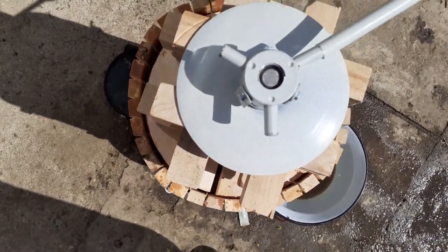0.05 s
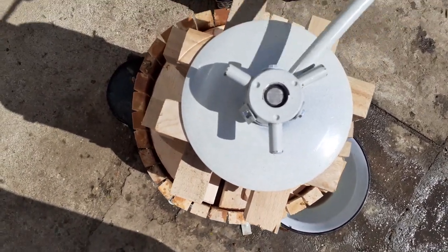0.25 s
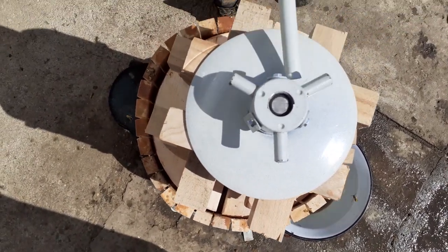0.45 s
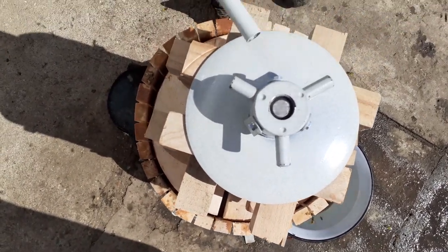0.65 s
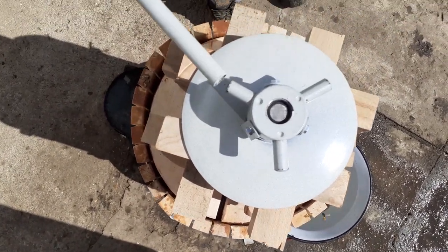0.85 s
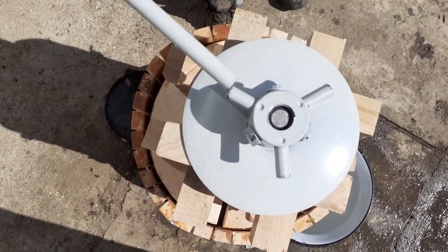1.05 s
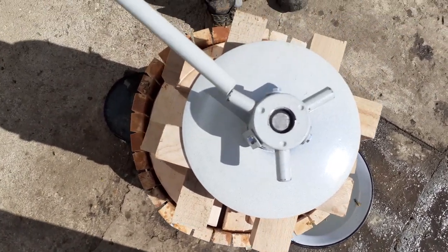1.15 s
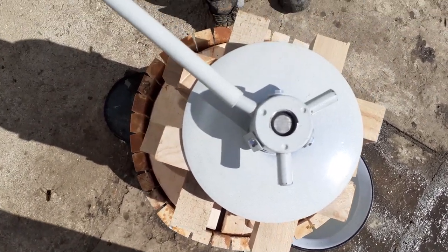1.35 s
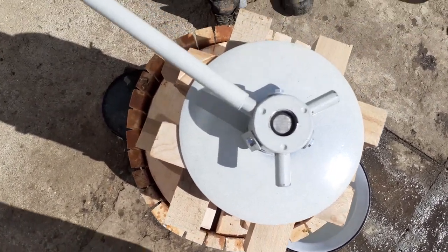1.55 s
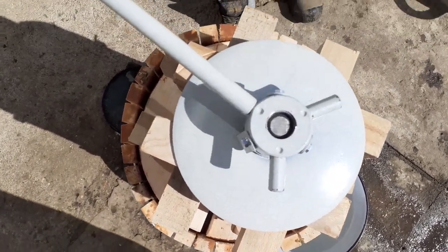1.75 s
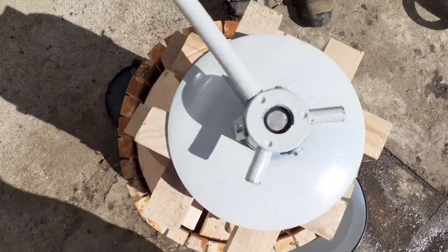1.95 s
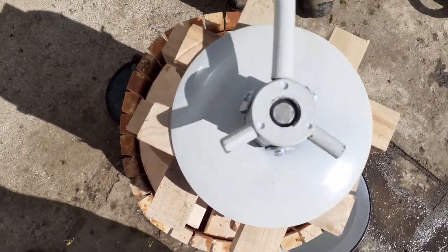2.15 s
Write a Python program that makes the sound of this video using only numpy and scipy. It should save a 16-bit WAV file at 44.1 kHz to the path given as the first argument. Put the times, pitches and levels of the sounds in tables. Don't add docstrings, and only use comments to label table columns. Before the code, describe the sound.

Metal pipe cracks against a screw press stub, rings briefly and is damped by hand; a small clank follows, then wood blocks tick and creak under load, with soft rustle and faint hiss, close-miked in a quiet yard.

```python
import sys
import numpy as np
from scipy import signal
from scipy.fft import rfft, irfft, next_fast_len
from scipy.io import wavfile
from scipy.ndimage import map_coordinates

SR = 44100
rng = np.random.default_rng(int(sys.argv[2]) if len(sys.argv) > 2 else 0)


def gain_from_db(level_db):
    decades = np.asarray(level_db, float) / 20
    return 10 ** decades


def inscribe(sig):
    pcm = np.round(np.clip(np.atleast_2d(sig).T, -1, 1) * 32767)
    wavfile.write(sys.argv[1], SR, pcm.astype(np.int16))


N = 97020

# frequency in Hz, level in dB, decay time T60 in seconds.
HUB = [(609.4, -9, 0.046), (704, -2.5, 0.029), (1040, -8.5, 0.034), (1176.5, -2, 0.043), (1231, 0, 0.043),
       (1561.6, -4, 0.066), (1877, -5.5, 0.067), (2050, -24.5, 0.062), (2337, -4, 0.033),
       (2550, -8.5, 0.026)]


def unit(x):
    return x / np.sqrt(np.mean(x ** 2) + 1e-20)


def along(points, hz):
    f, v = np.transpose(points)
    return np.interp(np.log(hz + 1), np.log(f + 1), v)


def curve(rows):
    s, v = np.transpose(rows)
    return np.interp(np.arange(N) / SR, s, v)


def wobble(rate):
    knots = rng.standard_normal(int(N * rate / SR) + 4)
    return map_coordinates(knots, [np.arange(N) * rate / SR])


def filtered(x, response):
    m = next_fast_len(x.shape[-1] + 8192)
    return irfft(rfft(x, m) * response(np.fft.rfftfreq(m, 1 / SR)), m)[..., :x.shape[-1]]


def causal(x, points):
    cepstrum = irfft(np.log(gain_from_db(along(points, np.fft.rfftfreq(2048, 1 / SR)))))
    cepstrum[1:1024] *= 2
    cepstrum[1025:] = 0
    impulse = irfft(np.exp(rfft(cepstrum)))[:1024]
    return signal.fftconvolve(x, impulse)[:len(x)]


def noise(points, size=N):
    return unit(filtered(rng.standard_normal(size), lambda hz: gain_from_db(along(points, hz))))


def add(track, s, sound):
    part = track[round(s * SR):][:len(sound)]
    part += sound[:len(part)]


def ring(modes, tilt_db, t, scatter_db):
    hz, db, t60 = np.transpose(modes)[:, :, None]
    draw = rng.standard_normal((2, len(modes), 1))
    level = gain_from_db(db + tilt_db * np.log2(hz / 2000) + scatter_db * draw[0] - 60 * t / t60)
    onset = 1 - np.exp(-t / .0004)
    return np.sum(level * np.sin(2 * np.pi * hz * t + .35 * draw[1]), 0) * onset


def tick(hz, cycles, t):
    turn = 2 * np.pi * hz * t * (1 + 0.63 * t * rng.standard_normal())
    main = np.sin(turn) * gain_from_db(-60 * t * hz / cycles)
    overtone = 0.058 * np.sin(2.494 * turn) * gain_from_db(-90 * t * hz / cycles)
    return (main + overtone) * np.clip(t / 0.00037, 0, 1)


def air():
    # frequency in Hz, level in dB.
    rumble = [(20, -32.5), (60, 0.5), (120, -11), (250, -20.5), (600, -68)]
    # frequency in Hz, level in dB.
    hiss = [(4000, -3.5), (6000, -13), (9000, -21), (10500, -3.5), (13000, 4.5), (15700, 1.5), (16000, -47)]
    # time in seconds, level in dB.
    hiss_swell = [(0, 1), (.6, -1), (1.3, -1.5), (1.6, 1.5), (1.87, 2), (1.895, 9), (1.92, 1), (2.2, 1)]
    # centre in seconds, half width in seconds, level in dB.
    gusts = [(0.054, 0.021, -52), (.33, 0.064, -55.5), (1.7, 0.014, -65), (1.81, 0.027, -65.5),
             (2.06, 0.074, -62)]
    breeze_db, hiss_db, hiss_left_db = -75.5, -72, 1.5
    thump_s, thump_db, thump_hz, thump_fall_s = .295, -46, 218, 0.017

    t = np.arange(N) / SR
    blow = gain_from_db(breeze_db) + sum(gain_from_db(db - 2.2 * ((t - s) / half) ** 2) for s, half, db in gusts)
    wind = blow * np.array([noise(rumble) * gain_from_db(2.0 * wobble(2.3)) for _ in range(2)])

    u, jolt = t[:SR // 6], np.zeros(N)
    turn = 2 * np.pi * (50 * u + thump_hz * thump_fall_s * (1 - np.exp(-u / thump_fall_s)))
    add(jolt, thump_s, gain_from_db(thump_db) * np.sin(turn) * (u / 0.013) * np.exp(1 - u / 0.014))

    hiss_level = gain_from_db([[hiss_db + hiss_left_db], [hiss_db]]) * gain_from_db(curve(hiss_swell))
    return wind + jolt * gain_from_db([[4], [-4]]) + hiss_level * np.array([noise(hiss), noise(hiss)])


def puffs():
    # centre in seconds, half width in seconds, level in dB, centre frequency in Hz.
    brushes = [(.055, 0.011, -66.5, 5600), (.853, 0.0068, -67.5, 3550), (1.022, .012, -73, 5800),
               (1.097, 0.0074, -65, 3660), (1.225, .008, -69.5, 4000)]
    t, out = np.arange(N) / SR, np.zeros(N)
    for s, half, db, hz in brushes:
        band = noise([(hz / 2.5, -30), (hz, 0), (hz * 1.34, -30), (hz * 2, -80)])
        out += gain_from_db(db - 4.6 * ((t - s) / half) ** 2) * band
    return out


def rustle():
    # frequency in Hz, level in dB per Hz.
    colour = [(60, -15.5), (180, -8), (290, -1.5), (400, -5), (560, -2.5), (1000, -8.5), (2600, -12),
              (3300, -17), (6000, -31), (9000, -55.5)]
    # frequency in Hz, level in dB.
    shadow = [(60, -11), (300, -9), (700, -12.5), (1500, -22.5), (3000, -28), (6000, -14.5), (12000, -12)]
    # time in seconds, level in dB.
    work = [(0, -54), (.55, -58), (.7, -60), (.8, -60), (1.3, -59), (1.55, -57), (1.68, -54), (1.85, -52.5),
            (2.0, -54.5), (2.2, -54.5)]
    # frequency in Hz, level in dB.
    grain_modes = [(330, -4.5), (580, -5.5), (760, -4.5), (1400, -2.5), (2620, -5)]
    grains_per_s, grain_db, alike = 260, -6, 0.49

    grains, t = np.zeros(N), np.arange(SR // 25) / SR
    for u, a, b in rng.random((int(grains_per_s * N / SR), 3)):
        hz, db = grain_modes[int(b * len(grain_modes))]
        grain = tick(hz * (1 + .07 * rng.standard_normal()), 14 + hz / 45, t)
        add(grains, u * N / SR, gain_from_db(db - 5.4 * np.log(1 - a + .02)) * grain)
    near = noise(colour) * gain_from_db(1.96 * wobble(24.766)) + gain_from_db(grain_db) * unit(grains)
    far = alike * near + np.sqrt(1 - alike ** 2) * noise(colour)
    far = filtered(far, lambda hz: gain_from_db(along(shadow, hz)))
    return gain_from_db(curve(work) + 3.5) * np.array([near, far])


def wood():
    # start in seconds, peak in dB, frequency in Hz.
    ticks = [(0.014, -38, 744), (0.591, -44.5, 1010), (0.734, -45, 683), (0.769, -34.5, 689),
             (1.312, -51.5, 511), (1.409, -44.5, 646), (1.419, -38, 710), (1.434, -41.5, 600),
             (1.460, -42, 664), (1.48, -48.5, 623), (1.5, -45, 492), (1.538, -43.5, 570), (1.556, -46, 540),
             (1.581, -40.5, 760), (1.608, -40, 565), (1.639, -43, 530), (1.671, -37.5, 459),
             (1.697, -34.5, 520), (1.737, -33, 677), (1.742, -35, 710), (1.75, -38.5, 546),
             (1.772, -37.5, 640), (1.82, -46, 526), (1.869, -40.5, 705), (1.891, -34, 740),
             (1.92, -32, 507), (2.004, -33.5, 518), (2.039, -41, 575), (2.052, -43, 630), (2.119, -41, 485)]
    # start in seconds, peak in dB, frequency in Hz.
    pings = [(0.777, -42, 2586), (1.353, -42.5, 1890), (1.318, -43, 2150), (1.509, -47.5, 1560),
             (1.581, -53, 2770), (1.611, -47, 1520), (1.736, -43, 1240), (1.776, -53, 1700),
             (1.872, -43.5, 1103), (1.898, -39, 1575), (2.1, -59, 2610), (2.124, -42.5, 2475),
             (2.14, -45.5, 1295), (2.181, -47.5, 1415)]
    # start in seconds, length in seconds, level in dB, first and last pitch in Hz.
    creaks = [
        (.785, .06, -56, 330, 290),
        (1.67, .025, -48, 470, 520),
        (1.82, .06, -53, 500, 800),
        (1.933, .03, -47, 470, 600),
        (1.945, .035, -58, 2750, 2300),
        (2.015, .03, -49, 480, 620),
    ]

    out, t = np.zeros(N), np.arange(SR // 8) / SR
    for s, db, hz in ticks:
        woken = gain_from_db(-27) * ring(HUB, -4.5, t, scatter_db=8.5)
        add(out, s, gain_from_db(db) * (tick(hz, 18.2, t) + woken))
    for s, db, hz in pings:
        add(out, s, gain_from_db(db) * tick(hz, 60, t))
    for s, length, db, from_hz, to_hz in creaks:
        u = np.clip(t / length, 0, 1)
        pitch = (from_hz + (to_hz - from_hz) * u) * (1 + 0.038 * wobble(110)[:len(t)])
        level = gain_from_db(db + 4.2 * wobble(118)[:len(t)]) * np.sqrt(np.abs(np.sin(np.pi * u)))
        add(out, s, level * np.sin(2 * np.pi * np.cumsum(pitch) / SR))
    return out


def hub_blows():
    # start in seconds, peak in dB, brightness in dB an octave, favoured frequency in Hz.
    thuds = [(0.2153, -20.5, 7, 1300), (0.2608, -27, 5, 1240), (.284, -31, -3.5, 700),
             (0.292, -33, -2, 1205), (0.299, -34, -2.5, 1550), (0.324, -41.5, -2.5, 1330),
             (0.3548, -36.5, 6, 1290), (0.422, -37.5, 0.5, 1335), (0.4423, -29.5, 0, 1100),
             (.450, -22, 5, 1790), (.461, -29.5, -2, 1497), (0.4702, -26.5, 0.5, 1150),
             (0.481, -27, -2, 1430), (0.493, -36.5, -3.5, 1200), (0.502, -42, -4, 1530),
             (0.9362, -35, 1, 594), (0.939, -27, -0.5, 1230), (1.138, -51.5, -8, 1020),
             (1.318, -43.5, -1.5, 1200), (1.349, -50.5, -5, 960), (1.383, -47, -6.5, 1180),
             (1.697, -40, -6, 1250)]
    favour_db, favour_octaves = 4, 0.24
    dense_db, dense_t60 = -1, 0.059

    out, t = np.zeros(N), np.arange(SR // 5) / SR
    for s, db, tilt_db, favour_hz in thuds:
        modes = []
        for hz, level, t60 in HUB:
            nearness = np.exp(-(np.log2(hz / favour_hz) / favour_octaves) ** 2)
            modes.append((hz, level + favour_db * nearness, t60))
        colour = [(300, -20.5), (1500, 6), (2400, tilt_db - 5.5), (5000, 2 * tilt_db - 27), (7000, -58.0)]
        dense = noise(colour, size=len(t))
        dense *= gain_from_db(dense_db - 60 * t / dense_t60) * np.clip(t / 0.0012, 0, 1)
        add(out, s, gain_from_db(db) * (ring(modes, tilt_db, t, scatter_db=1.56) + dense))
    return out


def scrapes():
    # start in seconds, length in seconds, level in dB, brightness in dB an octave.
    strokes = [(0, 0.014, -41, -7), (0.272, 0.068, -34.5, -1), (0.442, 0.049, -25.5, 3),
               (0.771, 0.02, -47.5, -8.5), (1.347, 0.02, -48, -9), (1.399, 0.027, -50, -6),
               (1.493, 0.0096, -52.5, 4), (1.578, .045, -50.5, -0.5), (1.625, 0.069, -47, -8),
               (1.684, 0.013, -36, -9.5), (1.709, 0.014, -39, 1.5), (1.882, 0.024, -41.5, 4.5),
               (2.007, .012, -39, -1.5), (2.144, 0.028, -49.5, 8.5)]
    # frequency in Hz, level in dB.
    contact = [(200, -34.5), (1400, 3), (3500, 1), (6500, -26), (8500, -39), (12000, -31)]

    out, t = np.zeros(N), np.arange(SR // 5) / SR
    for s, length, db, tilt_db in strokes:
        push = unit(rng.standard_normal(len(t)) * gain_from_db(5.9 * wobble(400)[:len(t)]))
        push *= np.clip(t / .006, 0, 1) * gain_from_db(-8 * t / length - 60 * np.maximum(t - length, 0) / .035)
        body = signal.fftconvolve(push, ring(HUB, tilt_db, t, scatter_db=0.5))[:len(t)] / 40
        broad = [(hz, level + tilt_db * np.log2(hz / 2000)) for hz, level in contact]
        add(out, s, gain_from_db(db) * (body + causal(push, broad)))
    return out


def clacks():
    # start in seconds, level in dB, frequency in Hz, cycles to -60 dB.
    blows = [(.2146, -11, 2170, 24), (0.2594, -13, 2160, 25.5), (.4425, -14, 2400, 29.5),
             (0.4438, -13, 4520, 53), (.4703, -19.5, 5110, 60.5)]
    out, t = np.zeros(N), np.arange(SR // 20) / SR
    for s, db, hz, cycles in blows:
        add(out, s, gain_from_db(db - 60 * t * hz / cycles) * np.sin(2 * np.pi * hz * t) * np.clip(t / .0008, 0, 1))
    return out


def cracks():
    # start in seconds, level in dB, centre frequency in Hz, decay time T60 in seconds.
    contacts = [(0.2149, -12.5, 2300, 0.031), (0.259, -15, 2300, 0.02), (.442, -23, 4250, 0.042),
                (0.4694, -25.5, 6000, 0.018), (0.47, -35, 4250, 0.11), (0.9407, -50, 4000, 0.0087)]
    width_db = -24
    out, t = np.zeros(N), np.arange(SR // 8) / SR
    for s, db, hz, t60 in contacts:
        colour = [(hz / 4, 2 * width_db), (hz, 0), (2 * hz, width_db), (4 * hz, 3 * width_db)]
        if_modes = noise(colour, size=len(t)) * gain_from_db(-60 * t / t60)
        snap = noise([(500, -21.5), (3000, -3.5), (16000, -21.5)], size=len(t))
        snap *= gain_from_db(-10 - 60 * t / 0.0022)
        add(out, s, gain_from_db(db) * np.clip(t / 0.00049, 0, 1) * (if_modes + snap))
    return out


def pipe():
    # start in seconds, peak in dB, free ringing in seconds, brightness in dB an octave,
    # lingering level in dB.
    clanks = [
        (0.2144, -19, 0.041, 3.5, -6),
        (0.262, -23.5, 0.031, 4.5, 10.5),
        (.442, -11, 0.0061, 0.5, -9.5),
        (0.4703, -35.5, 0.025, 12.5, -0.5),
        (1.317, -48, 0.017, -11, -25),
        (1.349, -36, 0.0086, -15, -12.5),
    ]
    mode_hz = [1610, 3074, 4912, 7090, 9500, 12105, 15678]
    # level in dB, decay time T60 in seconds.
    free_rows = [(-21.5, 0.13), (-4, 0.6), (-11, 0.09), (-28, 0.1), (-35, 0.1), (-28.5, 0.044), (-40, .14)]
    # level in dB, decay time T60 in seconds.
    linger_rows = [(-27, .3), (-13, .2), (-32, .2), (-44, .45)]
    gripped_t60 = 0.024

    out, t = np.zeros(N), np.arange(SR // 3) / SR
    modes = [(hz, *row) for hz, row in zip(mode_hz, free_rows)]
    linger = [(hz, *row) for hz, row in zip(mode_hz, linger_rows)]
    for s, db, free, tilt_db, linger_db in clanks:
        grip = gain_from_db(-60 * np.maximum(t - free, 0) / gripped_t60)
        gripped = grip * ring(modes, tilt_db, t, scatter_db=1.54)
        lasting = gain_from_db(linger_db) * ring(linger, 0, t, scatter_db=2.5)
        add(out, s, gain_from_db(db) * (gripped + lasting))
    return out


def yard(x):
    t = np.arange(SR // 3) / SR
    late = np.pad(x, (200, 0))
    answers = []
    for _ in range(2):
        tail = noise([(3000, -10.0), (8000, -14.5)], size=len(t)) * gain_from_db(-60 * t / 0.15)
        answers.append(signal.fftconvolve(late, tail / np.linalg.norm(tail))[:N])
    return np.array(answers)


def scene():
    # frequency in Hz, level in dB.
    mic = [(60, -27.5), (250, -3), (500, -1), (6800, -2), (8500, -17), (11500, -5), (15750, -5),
           (16100, -14.5)]
    # frequency in Hz, level in dB.
    shade = [(60, -10.5), (300, -11), (700, -14.5), (1500, -27), (3000, -28.5), (6000, -25.5),
             (12000, -26.5)]
    pipe_shade_db, right_lag_s = 7, .0001

    lever = 2 * causal(pipe(), mic)
    rest = 2 * causal(clacks() + cracks() + hub_blows() + scrapes() + wood(), mic)
    wet = gain_from_db(-20) * yard(lever + rest)
    late = np.pad(gain_from_db(pipe_shade_db) * lever + rest, (round(right_lag_s * SR), 0))[:N]
    press = np.array([lever + rest + wet[0], causal(late + gain_from_db(4.5) * wet[1], shade)])
    return press + rustle() + air() + puffs() * gain_from_db([[5], [-8]])


def low_pass(x):
    return signal.sosfilt(signal.butter(12, 16870, fs=SR, output="sos"), x)


def record(dry):
    mix = dry / (1 + np.abs(dry / 1.1) ** 6) ** (1 / 6)
    return low_pass(mix)


dry = scene()
out = record(dry)
inscribe(out)
```